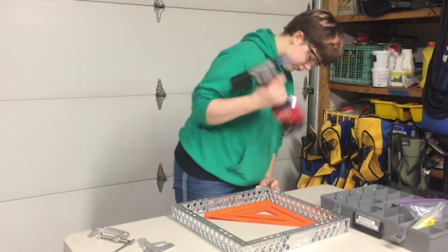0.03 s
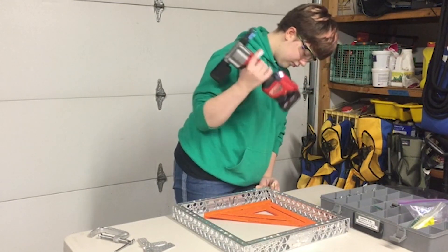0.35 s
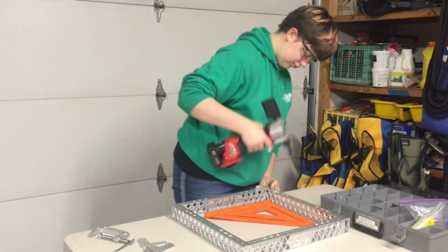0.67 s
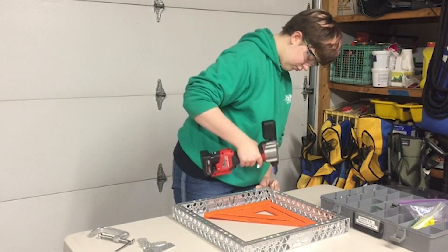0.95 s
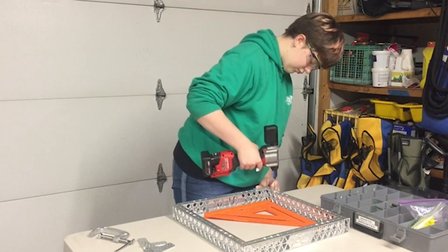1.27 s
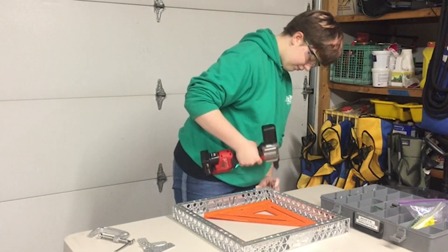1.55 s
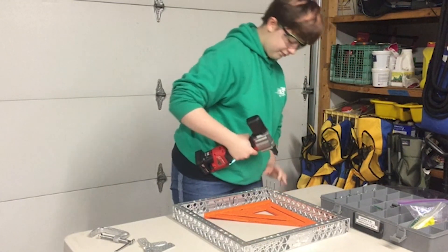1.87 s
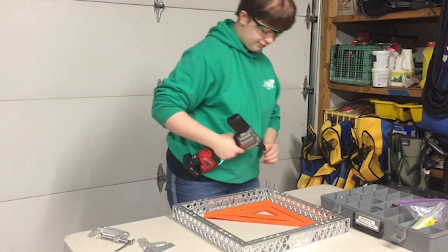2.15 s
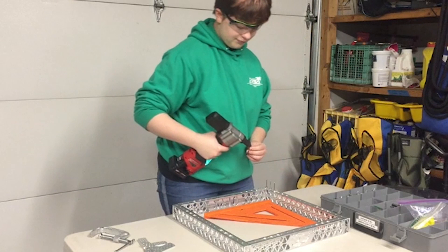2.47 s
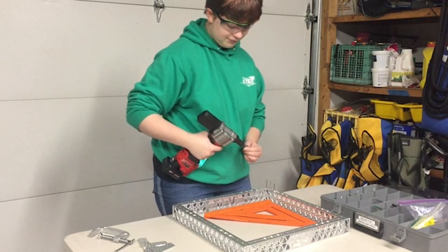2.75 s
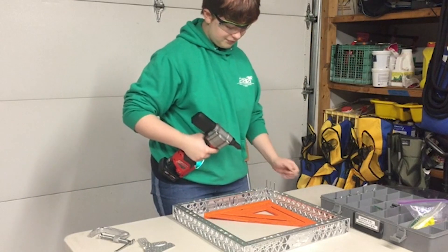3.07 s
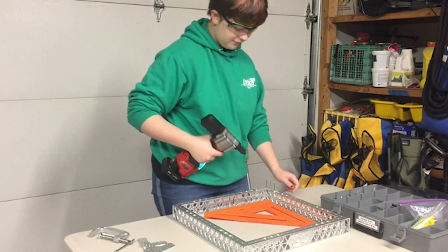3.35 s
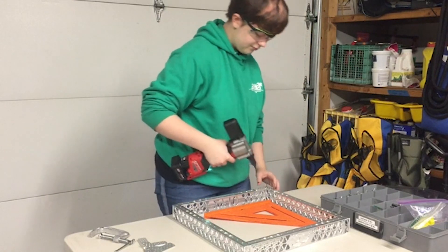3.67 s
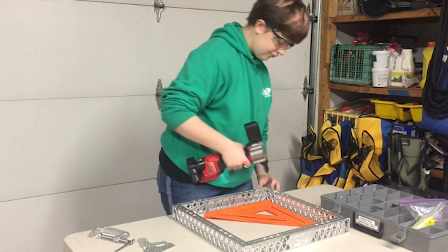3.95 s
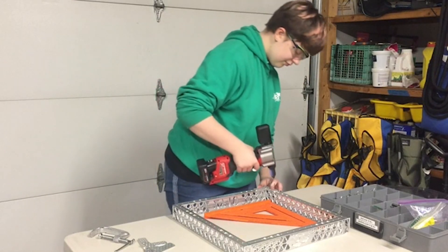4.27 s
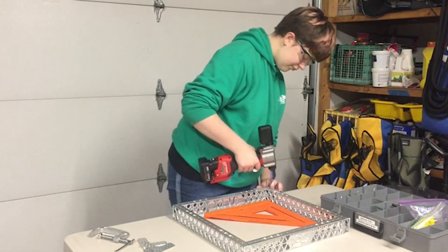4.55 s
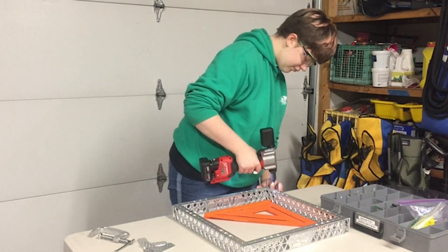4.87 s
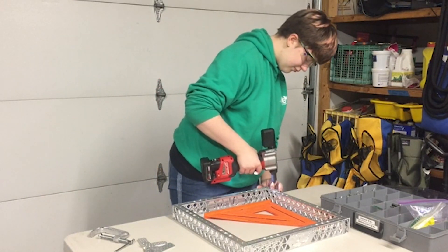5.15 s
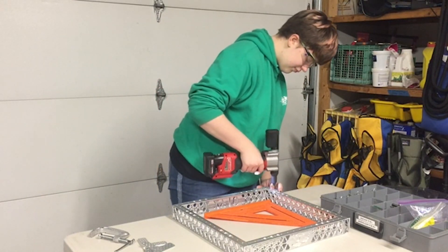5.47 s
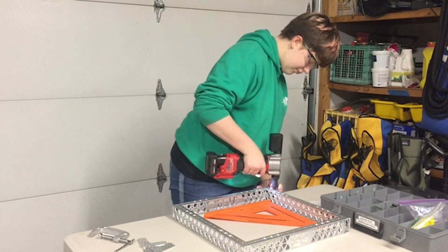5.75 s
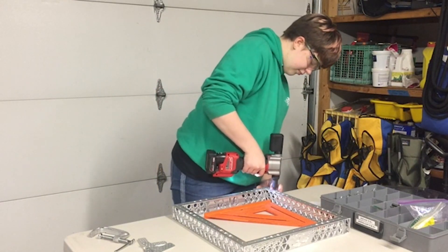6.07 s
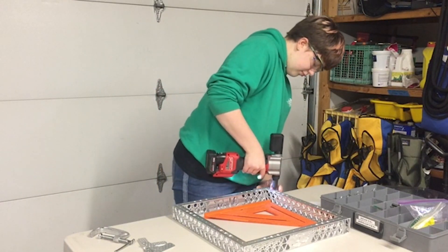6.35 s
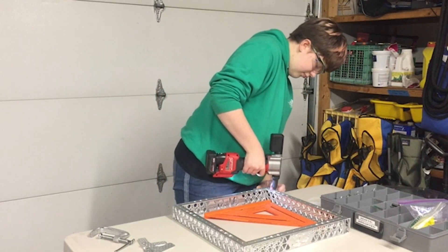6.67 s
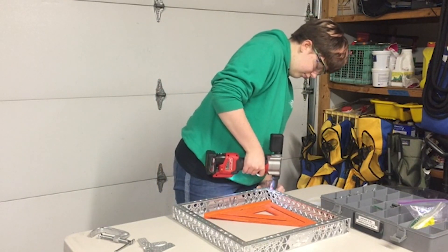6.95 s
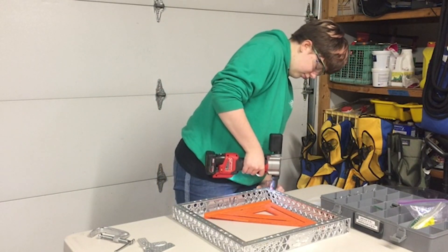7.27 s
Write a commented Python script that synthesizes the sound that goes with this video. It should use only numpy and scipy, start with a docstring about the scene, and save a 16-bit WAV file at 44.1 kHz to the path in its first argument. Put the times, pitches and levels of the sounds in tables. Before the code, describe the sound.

Loose metal pins rattle twice in the plastic cup of a cordless rivet tool. After faint ticks and squeaks, a steel pin drops and bounces with a ringing clink. The tool's nose knocks against an aluminium frame on a plastic table. Then the geared motor whirs up and strains until the rivet snaps, loud enough to overload the microphone. A bare garage adds short echoes and a low hum.

```python
"""Spent mandrels rattle in the catch cup of a cordless rivet tool as it is tipped back and forth.
Metal parts tick and squeak, a new rivet is fed in, a steel pin drops and bounces, and the nose knocks
against an aluminium frame on a plastic table. The geared motor spins up with a short groan and pulls
under growing load until the mandrel snaps, overloading the microphone. A bare garage reflects it all
over a low rumble and hum."""
import sys
import numpy as np
from scipy import signal
from scipy.fft import rfft, irfft, next_fast_len
from scipy.io import wavfile
from scipy.ndimage import uniform_filter1d, map_coordinates

SR = 44100
rng = np.random.default_rng(int(sys.argv[2]) if len(sys.argv) > 2 else 0)


def master(y):
    """Save y as 16-bit WAV."""
    cut = np.clip(np.atleast_2d(y).T, -1, 1)
    pcm = np.round(cut * 32767)  # scale
    wavfile.write(sys.argv[1], SR, pcm.astype(np.int16))


N = 331632
TIME = np.arange(N) / SR
RING_TIME = TIME[:SR // 2]
TEN_MS_GAIN = np.sqrt(SR / 100)  # unit energy to rms 1 over 10 ms

# gear tones: shaft_multiple, free_gain_db, loaded_gain_db
GEAR_TONES = [(1, -14.5, -6.5), (2.87, -22, -15.5), (3.87, -38, -15), (4, -11.5, -14.5), (5, -23, -24),
              (7.9, -14, -13), (8.2, -27, -10), (8.55, -29, -8.5), (8.9, -21, -13), (13.5, -14, -17),
              (17, -27, -26), (18, -23, -23)]
# grind spectra, free and loaded: freq_hz, gain_db
FREE_GRIND_SPECTRUM = [(88, -36), (150, -16), (193, -15), (450, -15.5), (505, -12.5), (742, -15), (802, 2),
                       (900, -6), (1070, 0), (1270, -19), (1570, -10), (1730, -11), (3340, -1),
                       (4910, -17.5), (15000, -35)]
LOADED_GRIND_SPECTRUM = [(88, -34), (150, -17.5), (182, -7), (234, -28), (310, -20), (420, -17.5),
                         (515, -10.5), (567, -14), (991, -17), (1540, -9.5), (2270, -16), (3270, -11),
                         (3750, -16), (5400, -17.5), (7210, -25.5), (15000, -33)]
TRIGGER_S, SPIN_UP_S, GRIP_S, GRIP_SPREAD_S = 6.782, 0.085, 7.183, 0.027
FREE_SHAFT_HZ, GRIP_SAG_HZ, STRETCH_SAG_HZ_PER_S = 211.7, 23.54, 54
MOTOR_GAIN_DB, LOAD_GAIN_DB, YIELD_DB_PER_S = -27.2, 6, -6
WAVER_DB, WAVER_RAD = 2.0, 0.24


def motor():
    """Gears whine and grind; the load slows the shaft and hardens the sound."""
    shaft_hz, load, amplitude = pull()
    shaft_rad = 2 * np.pi * np.cumsum(shaft_hz * (1 + 0.00713 * walk(60))) / SR
    bunching = 1 + 0.33 * np.cos(shaft_rad)  # loose tooth impacts bunch once a turn
    teeth = unit_rms(grains(per_s=5000, spread_db=2.5) * bunching) + tooth_errors(shaft_rad)
    running = TIME > TRIGGER_S
    free = colour(teeth, FREE_GRIND_SPECTRUM)
    loaded = colour(teeth, LOADED_GRIND_SPECTRUM)
    grind = np.sqrt(1 - load) * free / np.std(free[running])
    grind += np.sqrt(load) * loaded / np.std(loaded[running])
    whine = 0
    for multiple, free_db, loaded_db in GEAR_TONES:
        waver = multiple ** 0.35  # fast meshes waver more
        gain_db = free_db + load * (loaded_db - free_db) + WAVER_DB * waver * walk(70)
        phase_rad = multiple * shaft_rad + WAVER_RAD * waver * walk(120)
        whine += np.sqrt(2) * undb(gain_db) * np.sin(phase_rad)
    return amplitude * (undb(-2.5) * grind + undb(-6.5) * whine)


def pull():
    """The motor spins up, the jaws grip, then the yielding rivet slows the shaft further."""
    spin = 1 - np.exp(-np.maximum(TIME - TRIGGER_S, 0) / SPIN_UP_S)
    load = (1 + np.tanh((TIME - GRIP_S) / (2 * GRIP_SPREAD_S))) / 2
    stretch_s = np.maximum(TIME - GRIP_S, 0)
    shaft_hz = FREE_SHAFT_HZ * spin - GRIP_SAG_HZ * load - STRETCH_SAG_HZ_PER_S * stretch_s
    amplitude = spin ** 4.02 * undb(MOTOR_GAIN_DB + LOAD_GAIN_DB * load + YIELD_DB_PER_S * stretch_s)
    return shaft_hz, load, amplitude


def tooth_errors(shaft_rad, flaws=800, turns_per_round=3.5):
    """Tooth flaws recur in the same order with every round of the planet gears."""
    place = shaft_rad / (2 * np.pi * turns_per_round) * flaws
    return map_coordinates(rng.standard_normal(flaws), [place % flaws], order=3, mode="grid-wrap")


# break spectrum: freq_hz, gain_db
SNAP_SPECTRUM = [(65, -40), (95, -26), (120, -5.5), (494, -8.5), (582, -9), (645, 2), (686, -12), (745, 1),
                 (809, -5.5), (1170, 1), (2130, -8.5), (6070, -18), (8970, -20), (15000, -22.5)]
# tool, frame and table modes: pitch_hz, gain_db, t60_s
RECOIL_MODES = [(132, -16, 0.45), (249, -2, 0.45), (503, 1, 0.078), (880, -8, 0.085), (1176, 3.5, 0.075),
                (1327, -2, 0.11), (1590, -14, 0.12), (1580, -7, .25), (11670, 0, 0.054)]
SNAP_S, SNAP_DB = 7.459, 2.5


def snap():
    """The mandrel breaks; the recoil rings the tool, frame and table."""
    out = np.zeros(N)
    burst = blow(SNAP_SPECTRUM, RECOIL_MODES, SNAP_DB, tilt_db=0, t60_s=0.05, ring_db=-8, crack=0.46)
    add(out, SNAP_S, burst)
    return out


# single mandrels on the cup wall: start_s, level_db, tilt_db_per_octave
MANDREL_HITS = [(0.137, -43.5, -6), (0.193, -37, 11), (0.201, -27, -0.5), (0.238, -30, 2), (0.255, -29, 0),
                (0.271, -26.5, 0), (0.284, -22.5, 2.5), (0.289, -25, 0.5), (0.347, -29, 5.5),
                (0.538, -51.5, -6), (0.717, -49, -9), (0.791, -37.5, -6), (0.823, -27.5, 6.5)]
# wall hit and slide spectra: freq_hz, gain_db
WALL_SPECTRUM = [(1000, -20.5), (1250, -7), (1550, -6.5), (1900, -1.5), (2400, 5), (3200, -5), (4300, -2),
                 (5000, -12), (6000, -10), (10000, -20.5), (14000, -29.5)]
SLIDE_SPECTRUM = [(240, -66), (400, -30), (567, -24.5), (701, -26), (1040, -18), (1330, -10), (1520, 0),
                  (1740, -7.5), (2390, -14.5), (3290, -10), (4390, -12.5), (5030, -28), (5510, -14.5),
                  (10400, -24), (13000, -24.5), (15000, -22)]
# cup modes: pitch_hz, gain_db, t60_s
WALL_MODES = [(1450, -7, 0.21), (1562, 5, 0.11), (2076, -7, 0.07), (2390, -6, .09), (2830, -4, 0.078),
              (3950, -14, 0.17), (4250, -9, .17), (5700, -12, .1), (14700, -15, .06)]


def catch_cup():
    """Loose mandrels skitter along the plastic cup and strike its ends."""
    skitter = grains(per_s=1900, spread_db=3.0)
    wall = unit_rms(signal.fftconvolve(skitter, ring(WALL_MODES))[:N])
    scrape = unit_rms(colour(skitter, SLIDE_SPECTRUM))
    out = unit_rms(scrape + undb(-9) * wall) * slide_envelope() * undb(-6.5)
    for start_s, level_db, tilt_db in MANDREL_HITS:
        hit = blow(WALL_SPECTRUM, WALL_MODES, level_db, tilt_db, t60_s=0.022, ring_db=-2, crack=0.32)
        add(out, start_s, hit)
    return out


# tips of the tool: creep_s, rush_s, rest_s, rush_gain_db
TOOL_TIPS = [(0.136, 0.168, 0.36, -34), (0.718, 0.819, 0.84, -23)]
CREEP_GAIN_DB, CREEP_ATTACK_S, RUSH_ATTACK_S, SWELL_DB_PER_S = -41.5, 0.0053, 0.031, 33.5


def slide_envelope():
    """After each tip a few mandrels creep, then all rush, gathering speed until they come to rest."""
    power = np.zeros(N)
    for creep_s, rush_s, rest_s, rush_gain_db in TOOL_TIPS:
        stages = (creep_s, CREEP_ATTACK_S, CREEP_GAIN_DB), (rush_s, RUSH_ATTACK_S, rush_gain_db)
        for start_s, attack_s, gain_db in stages:
            swell_db = SWELL_DB_PER_S * (np.clip(TIME, start_s, rest_s) - start_s)
            power += (undb(gain_db + swell_db) * held(start_s, rest_s, attack_s, t60_s=0.19)) ** 2
    return np.sqrt(power)


# pin landings: start_s, level_db, tilt_db_per_octave, pin_ring_db, surface_ring_db
PIN_LANDINGS = [(3.3624, -16, 2, -15, -9), (3.367, -13.5, -2.5, -25, 1.5), (3.465, -16.5, 3, -3.5, -23),
                (3.472, -21.5, 3, -6, -12)]
# contact spectrum: freq_hz, gain_db
LANDING_SPECTRUM = [(76, -53), (130, -28), (190, 0), (250, -4), (320, -11), (440, -13), (520, -3.5),
                    (718, -4.5), (893, -2.5), (1130, -6), (1590, -3.5), (2060, -11.5), (2660, -10.5),
                    (2940, -8), (3810, -14), (6000, -25.5), (7200, -32.5), (9310, -31), (15000, -53)]
# pin and surface modes: pitch_hz, gain_db, t60_s
STEEL_PIN_MODES = [(2872, 9, .09), (2890, -10, 0.19), (3006, -3, 0.27), (3100, 3, 0.2), (3250, -19.5, 0.08),
                   (4270, -7.5, 0.3), (4360, -4, 0.28), (4430, -6, 0.202), (6270, -31, .1)]
LANDING_MODES = [(178, -3, 0.19), (289.4, -7.5, 0.14), (443, -9.5, 0.115), (521, -1.5, 0.117),
                 (773, 0, 0.15), (890, -13, 0.12), (1035, -5, 0.1), (1175, 4.5, 0.055), (1306, -3.5, 0.13),
                 (1458, -5, .1), (1548, -3, 0.17)]


def pin():
    """A steel pin bounces, one end after the other, ringing itself and the surface under it."""
    out = np.zeros(N)
    for start_s, level_db, tilt_db, pin_db, surface_db in PIN_LANDINGS:
        clank = blow(LANDING_SPECTRUM, STEEL_PIN_MODES, 0, tilt_db,
                     t60_s=0.049, ring_db=pin_db, crack=0.44)
        landing = unit_energy(clank) + undb(surface_db) * ring(LANDING_MODES)
        add(out, start_s, at_level(landing, level_db))
    return out


# nose on frame: start_s, level_db, tilt_db_per_octave, cutoff_hz, table_ring_db, frame_ring_db
NOSE_KNOCKS = [(5.141, -41, 2.5, 6000, -1, -14), (5.149, -24.5, -0.5, 9000, 6, -22),
               (5.183, -47, 4.5, 11100, 4, -6), (5.572, -33.5, 5.5, 5460, 3, -17),
               (5.744, -28.5, -1, 201, 10, -45), (5.773, -32, -5, 170, 2, -40),
               (5.826, -21, 2, 10400, -15, -32), (5.834, -17, 1, 4040, -8.5, -40),
               (5.889, -34, 3.5, 11900, -10, -13), (5.922, -28.5, 1, 1100, -8, -40),
               (6.135, -31, 3, 2200, -11, -27)]
# thud spectrum: freq_hz, gain_db
THUD_SPECTRUM = [(47, -44), (80, -20), (130, -3.5), (188, 3), (339, -8.5), (538, -4.5), (655, -12),
                 (833, -10), (1870, -28), (2780, -30.5), (3540, -34), (4310, -29.5), (4910, -41),
                 (5850, -37.5), (15000, -47.5)]
# table and frame modes: pitch_hz, gain_db, t60_s
PLASTIC_TABLE_MODES = [(133.3, 0, 0.43), (167, -3.5, 0.22), (187.5, 1, 0.19), (268.7, -6, 0.27),
                       (385, -9, 0.11), (556, -2.5, 0.08), (604, -8.5, 0.12), (830, -20, 0.16)]
ALUMINIUM_MODES = [(1390, 0, 0.087), (2040, -0.5, 0.043), (2370, 2, 0.023), (2680, -3, 0.027),
                   (2884, -3, .06), (3190, 0, 0.038), (3930, 0.5, 0.07), (4100, -3, 0.075),
                   (4530, -9, 0.056), (5500, -21, .05)]
KNOCK_ATTACK_S = 0.0034


def knocks():
    """Blows pass through the frame into the table; a padded push loses its treble."""
    out = np.zeros(N)
    attack = np.clip(RING_TIME / KNOCK_ATTACK_S, 0, 1)
    for start_s, level_db, tilt_db, cutoff_hz, table_db, frame_db in NOSE_KNOCKS:
        thud = blow(THUD_SPECTRUM, PLASTIC_TABLE_MODES, 0, tilt_db,
                    t60_s=0.052, ring_db=table_db, crack=0.46)
        thud = signal.sosfilt(signal.butter(3, cutoff_hz, fs=SR, output="sos"), thud)
        knock = unit_energy(thud) + undb(frame_db) * ring(ALUMINIUM_MODES)
        add(out, start_s, at_level(attack * knock, level_db))
    return out


# gliding tones: start_s, start_hz, end_hz, length_s, level_db, overtones_db
GLIDES = [(0.71, 2240, 1960, 0.036, -45, -33), (1.763, 1565, 1323, 0.032, -50, -1.5),
          (6.745, 3020, 3010, 0.011, -54.5, -23), (6.956, 473, 562, 0.021, -37.5, -24)]
# their overtones: multiple, gain_db
GLIDE_OVERTONES = [(2, -10), (3, 0), (4, -8), (5, -21), (6, -13)]


def squeaks_and_groan():
    """Brief gliding tones: metal squeaks, and a short groan as the motor spins up."""
    out = np.zeros(N)
    for start_s, start_hz, end_hz, length_s, level_db, overtones_db in GLIDES:
        progress = np.linspace(0, 1, int(length_s * SR))
        glide_hz = start_hz + (end_hz - start_hz) * np.sqrt(progress)
        jitter = 1 + 0.045 * walk(550)[:len(progress)]
        phase_rad = 2 * np.pi * np.cumsum(glide_hz * jitter) / SR
        overtones = sum(undb(overtones_db + db) * np.sin(k * phase_rad) for k, db in GLIDE_OVERTONES)
        envelope = np.sqrt(progress * (1 - progress))
        add(out, start_s, undb(level_db) * unit_rms((np.sin(phase_rad) + overtones) * envelope))
    return out


# light metal contacts: start_s, level_db, tilt_db_per_octave, ring_db
RIVET_TICKS = [(1.729, -57, -4, -3), (1.754, -53, 2, -20), (1.772, -49.5, 1, -19), (1.907, -60.5, -3, 10),
               (2.787, -66, -2, -12), (2.966, -45, 17, -29), (5.222, -59, 7, -19), (6.359, -58.5, -10, -23),
               (6.748, -55, 20, -16), (6.781, -60, -3, -10)]
# contact spectrum: freq_hz, gain_db
TICK_SPECTRUM = [(900, -13), (1500, 1), (2400, 0), (4200, 0), (6500, 1), (10000, 1), (14500, -8.5)]
# rivet modes: pitch_hz, gain_db, t60_s
TICK_MODES = [(4230, -2, 0.42), (4570, -2, 0.45), (5940, -2.5, .23), (6470, -4, 0.71), (9600, -8, .2),
              (13430, -10, 0.13)]


def ticks():
    """Rivet and nose piece touch lightly and ring."""
    out = np.zeros(N)
    for start_s, level_db, tilt_db, ring_db in RIVET_TICKS:
        tick = blow(TICK_SPECTRUM, TICK_MODES, level_db, tilt_db, t60_s=0.02, ring_db=ring_db, crack=0.4)
        add(out, start_s, tick)
    return out


# the rivet touches, then slides in: start_s, length_s, level_db
FEED_PUSHES = [(2.905, 0.03, -62.5), (2.949, 0.014, -47.5)]
# scrape spectrum: freq_hz, gain_db
FEED_SPECTRUM = [(1500, -4.5), (2500, 0.5), (4300, 0), (6200, 3), (7500, -4), (11000, -11), (14000, -6)]


def feed_rivet():
    """The new mandrel scrapes through the jaws."""
    push = sum(undb(level_db) * held(start_s, start_s + length_s, attack_s=0.007, t60_s=0.025)
               for start_s, length_s, level_db in FEED_PUSHES)
    return unit_rms(colour(grains(per_s=2400, spread_db=1), FEED_SPECTRUM)) * push


# room decay: freq_hz, t60_s
GARAGE_DECAY = [(100, 0.3), (260, 0.39), (700, 0.31), (1840, 0.38), (4850, 0.4), (12800, 0.23)]
REFLECTION_ONSET_S = 0.0024


def garage(x, wet_db):
    """Direct sound, then dense reflections from bare walls that die soonest in the top treble."""
    t = RING_TIME
    noise = rfft(rng.standard_normal(len(t)))
    octave = np.log2(np.clip(np.fft.rfftfreq(len(t), 1 / SR), 64, 16384))
    tail = 0
    for centre in range(6, 15):
        band = irfft(noise * np.maximum(1 - abs(octave - centre), 0), len(t))
        tail += band * undb(-60 * t / on_log(2. ** centre, GARAGE_DECAY))
    response = undb(wet_db) * unit_energy(tail * np.clip(t / REFLECTION_ONSET_S, 0, 1))
    response[0] += 1
    return signal.fftconvolve(x, flatten(response) * np.linalg.norm(response))[:N]


# room rumble: freq_hz, gain_db
RUMBLE_SPECTRUM = [(18, -38), (30, -26), (65, 0), (107, -8), (139, -3.5), (211, -14), (240, -9.5),
                   (328, -16.5), (597, -23.5), (645, -27.5), (735, -25.5), (1030, -29.5), (1730, -32),
                   (2130, -36.5), (15000, -51.5)]
# appliance tones: pitch_hz, gain_db
HUM_TONES = [(80.7, -52.5), (145.3, -63), (177.6, -61.5), (242.2, -64), (360.7, -62.5), (602.9, -65.5),
             (721.4, -67), (1680, -69.5), (2401, -75)]
RUMBLE_DB, HUM_TRIM_DB = -47.5, -2.5


def background():
    """Low rumble of the room with the wavering hum of an appliance."""
    rumble = unit_rms(colour(rng.standard_normal(N), RUMBLE_SPECTRUM))
    rumble *= undb(RUMBLE_DB + 0.2 * walk(2.67))
    hum = 0
    for pitch_hz, gain_db in HUM_TONES:
        amplitude = np.sqrt(2) * undb(gain_db + HUM_TRIM_DB + 1.2 * walk(7))
        hum += amplitude * np.sin(2 * np.pi * pitch_hz * TIME + 0.85 * walk(14))
    return rumble + hum


def blow(spectrum, modes, level_db, tilt_db, t60_s, ring_db, crack):
    """One impact: a sharp crack, contact chatter that dies in t60_s, and the ringing body."""
    force = unit_energy(rng.standard_normal(len(RING_TIME)) * undb(-60 * RING_TIME / t60_s))
    force[0] += crack
    contact = unit_energy(colour(flatten(force), spectrum, tilt_db))
    return at_level(contact + undb(ring_db) * ring(modes), level_db)


def ring(modes):
    """Damped modes, struck a little differently each time."""
    out = 0
    for pitch_hz, gain_db, t60_s in modes:
        strike = undb(gain_db + 0.5 * rng.standard_normal()) * rng.choice([-1, 1])
        mode = np.sin(2 * np.pi * pitch_hz * RING_TIME) * undb(-60 * RING_TIME / t60_s)
        out += strike * unit_energy(mode)
    return unit_energy(out)


def grains(per_s, spread_db):
    """Dense tiny collisions of uneven size."""
    size = undb(spread_db * np.minimum(rng.exponential(size=N), 4)) * rng.choice([-1, 1], N)
    return unit_rms(size * (rng.random(N) < per_s / SR))


def colour(x, spectrum, tilt_db=0):
    """Minimum-phase filter: the spectrum, tilted per octave and falling away below its first point."""
    size = next_fast_len(len(x) + 8192) * 2
    hz = np.maximum(np.fft.rfftfreq(size, 1 / SR), 10)
    lowest_hz = spectrum[0][0]
    db = on_log(hz, spectrum) + tilt_db * np.log2(np.maximum(hz, 2 * lowest_hz))
    db += 24 * np.minimum(np.log2(hz / lowest_hz), 0)
    cepstrum = irfft(np.log(undb(db - db.max())))
    cepstrum[1:size // 2] *= 2
    cepstrum[size // 2 + 1:] = 0
    return irfft(rfft(x, size) * np.exp(rfft(cepstrum)))[:len(x)]


def flatten(x):
    """Level the broad spectral hills and dips of a burst, keeping its fine structure."""
    spectrum = rfft(x, 2 * len(x))
    power = uniform_filter1d(abs(spectrum) ** 2, size=40)
    return unit_energy(irfft(spectrum / np.sqrt(power + .02 * power.mean()))[:len(x)])


def held(start_s, end_s, attack_s, t60_s):
    """Envelope that reaches 1 at start_s, holds to end_s and dies away."""
    attack = np.clip(1 + (TIME - start_s) / attack_s, 0, 1)
    return attack * undb(-60 * np.maximum(TIME - end_s, 0) / t60_s)


def walk(rate_hz):
    """Smooth random drift with a spread near 1."""
    step = int(SR / rate_hz)
    return 1.3 * uniform_filter1d(np.repeat(rng.standard_normal(N // step + 1), step), step)[:N]


def on_log(hz, points):
    """Interpolate (freq_hz, value) points on a log-frequency axis."""
    freq_hz, value = np.transpose(points)
    return np.interp(np.log(hz), np.log(freq_hz), value)


def add(out, start_s, x):
    """Mix x into out from start_s."""
    i = int(start_s * SR)
    out[i:i + len(x)] += x[:N - i]


def at_level(x, level_db):
    """Scale to the energy of 10 ms at level_db."""
    return undb(level_db) * TEN_MS_GAIN * unit_energy(x)


def undb(db):
    return 10 ** (np.asarray(db) / 20)


def unit_rms(x):
    return x / np.sqrt(np.mean(x ** 2))


def unit_energy(x):
    return x / np.sqrt(np.sum(x ** 2))


def scene():
    """Tool, pin and table sound together in the garage."""
    in_hand = catch_cup() + ticks() + squeaks_and_groan() + feed_rivet() + motor()
    struck = pin() + knocks() + snap()
    return (garage(in_hand, wet_db=-3.5) + garage(struck, wet_db=1.0) + background())[None]


PORT_HZ, PORT_WIDTH_HZ, PORT_DB, TOP_HZ = 14520, 1100, 5.5, 15050


def record(dry):
    """The microphone port lifts the highest treble; the input overloads and the top is cut."""
    port = signal.lfilter(*signal.iirpeak(PORT_HZ, PORT_HZ / PORT_WIDTH_HZ, fs=SR), dry)
    heard = dry + (undb(PORT_DB) - 1) * port
    clipped = heard / (1 + heard ** 8) ** (1 / 8)
    return signal.sosfilt(signal.ellip(10, .2, 70, TOP_HZ, fs=SR, output="sos"), clipped)


dry = scene()
out = record(dry)
master(out)
```